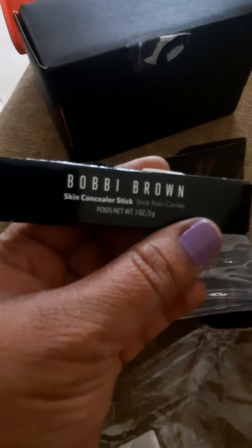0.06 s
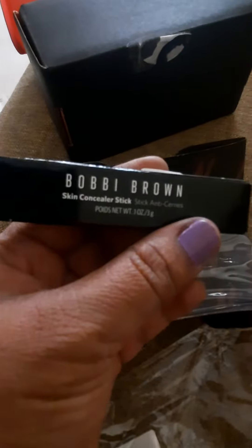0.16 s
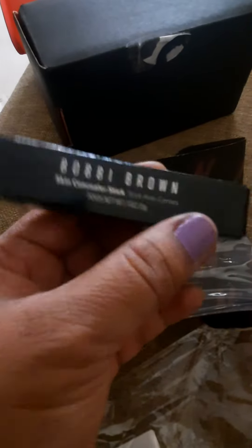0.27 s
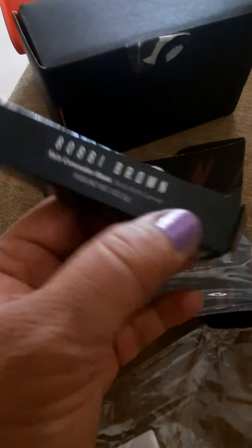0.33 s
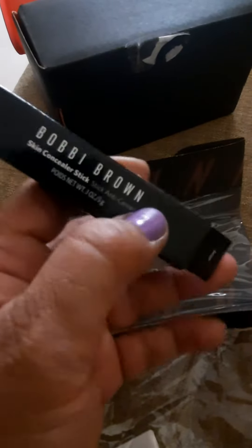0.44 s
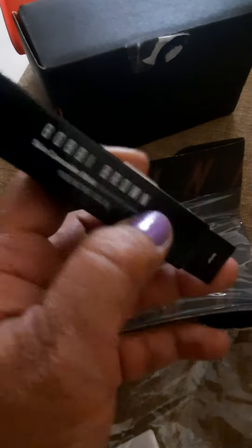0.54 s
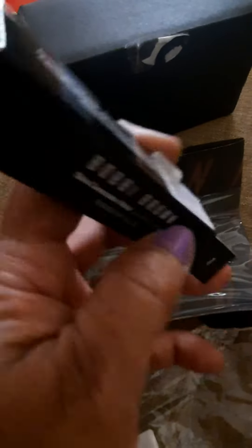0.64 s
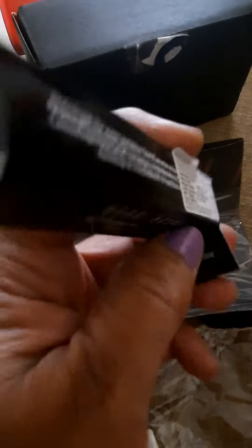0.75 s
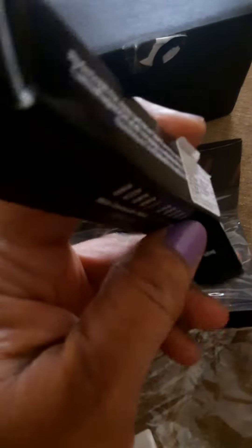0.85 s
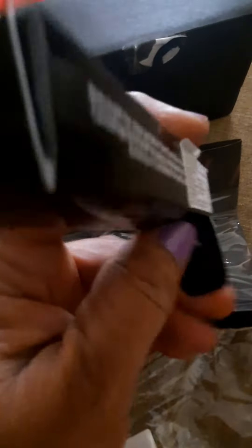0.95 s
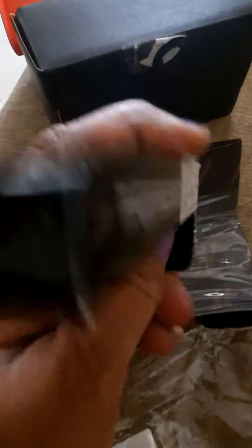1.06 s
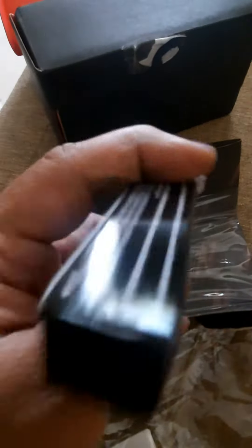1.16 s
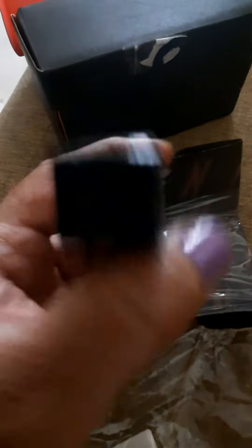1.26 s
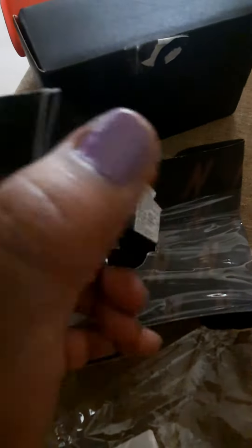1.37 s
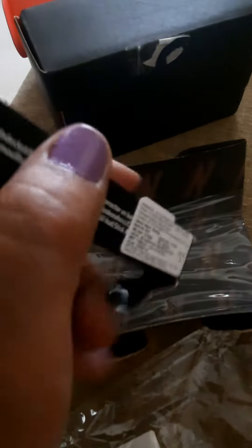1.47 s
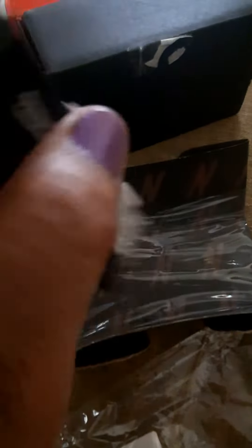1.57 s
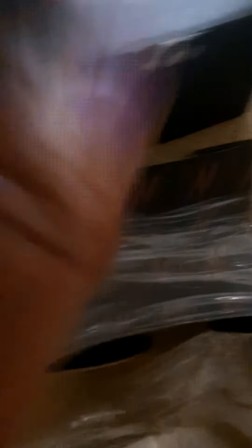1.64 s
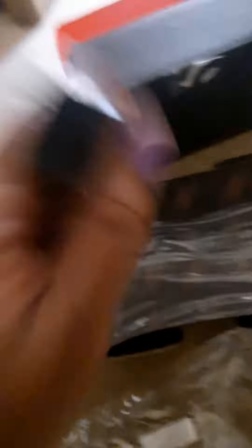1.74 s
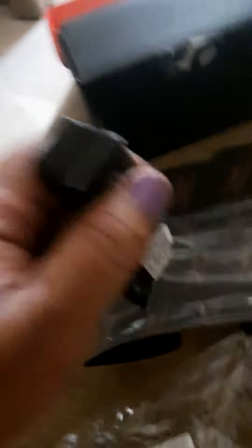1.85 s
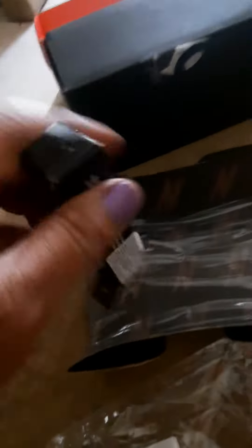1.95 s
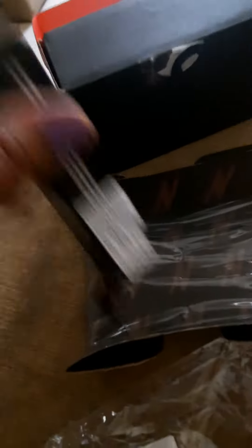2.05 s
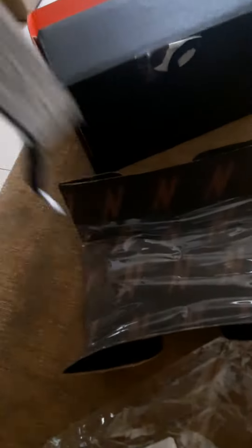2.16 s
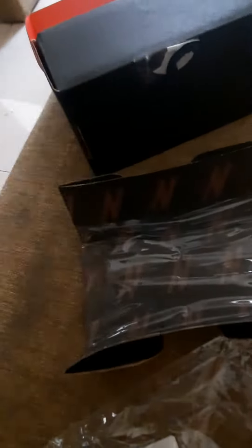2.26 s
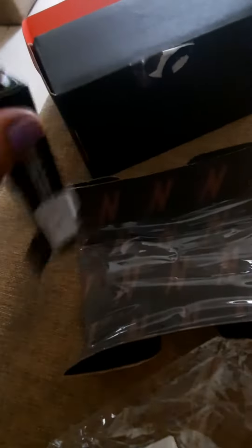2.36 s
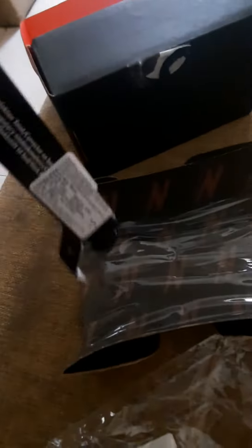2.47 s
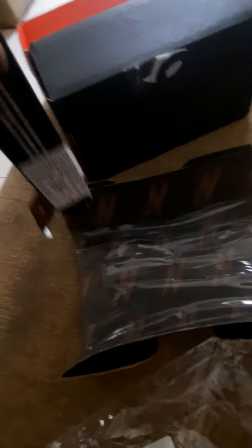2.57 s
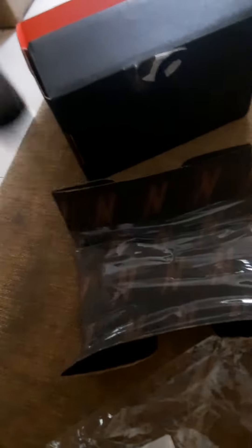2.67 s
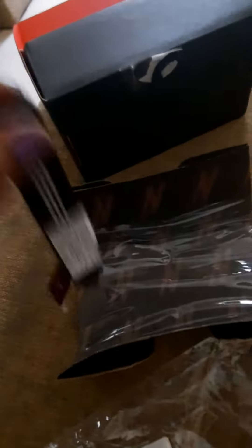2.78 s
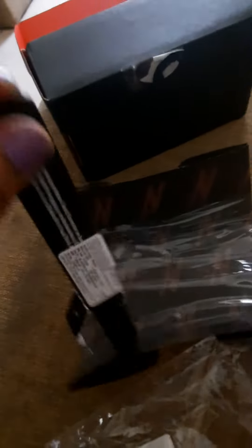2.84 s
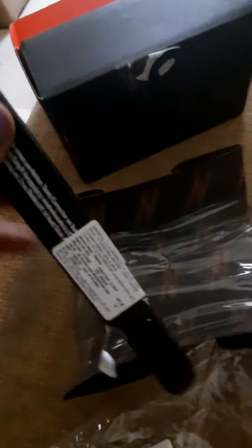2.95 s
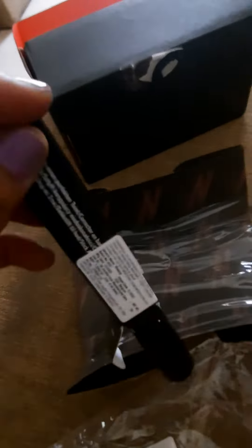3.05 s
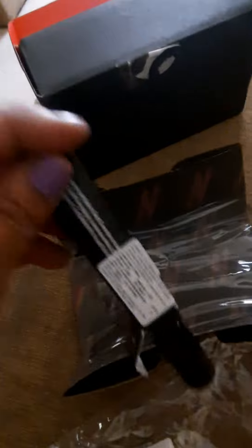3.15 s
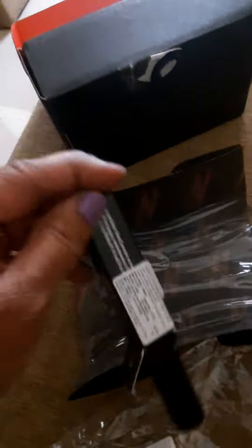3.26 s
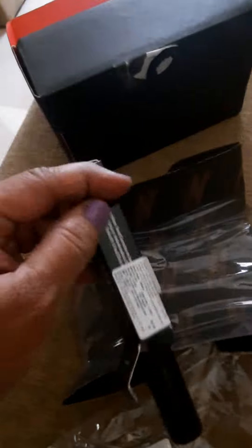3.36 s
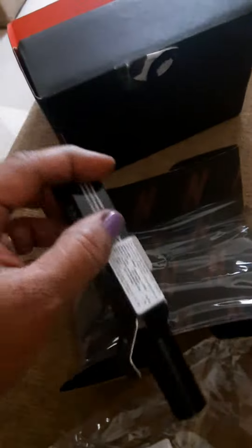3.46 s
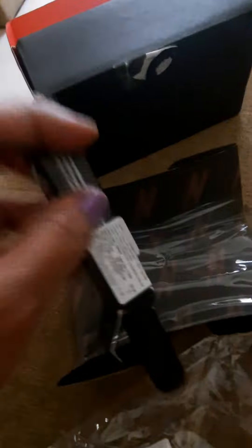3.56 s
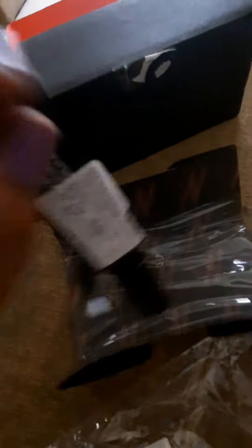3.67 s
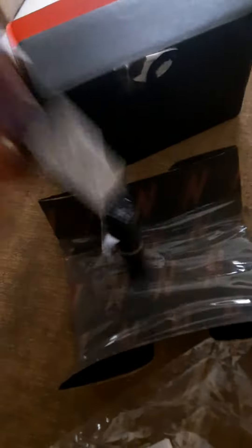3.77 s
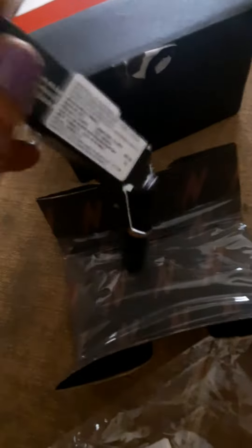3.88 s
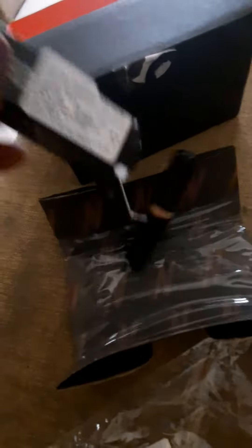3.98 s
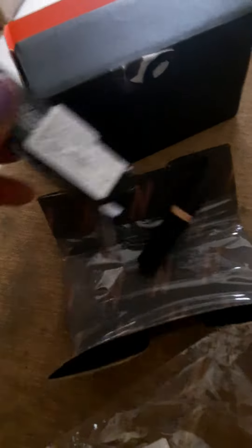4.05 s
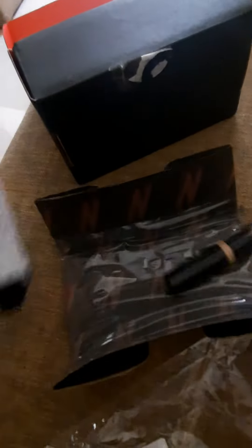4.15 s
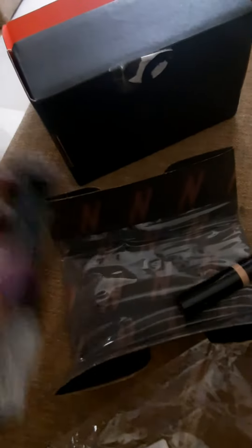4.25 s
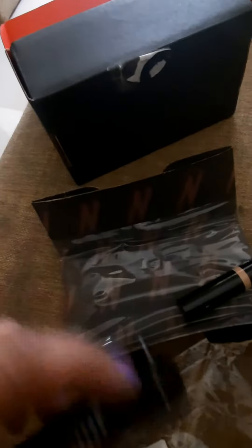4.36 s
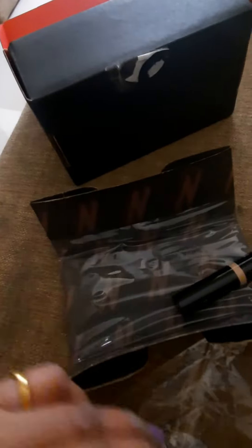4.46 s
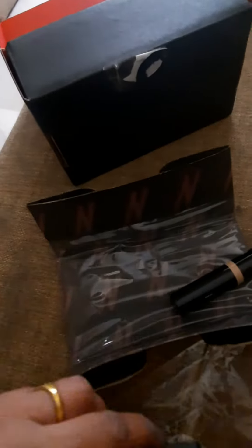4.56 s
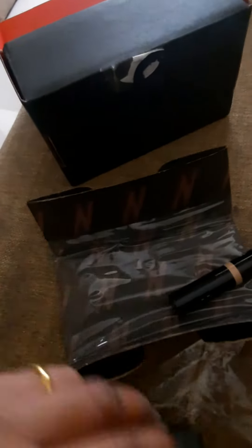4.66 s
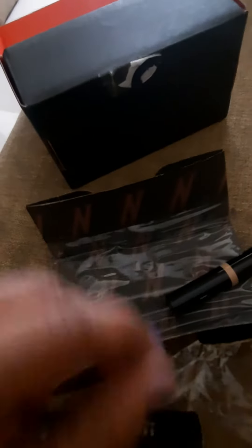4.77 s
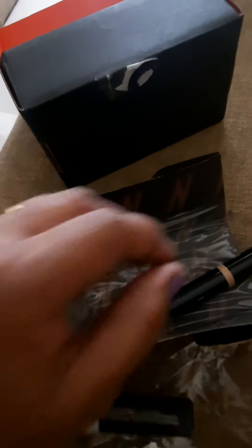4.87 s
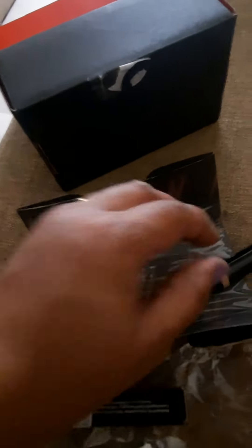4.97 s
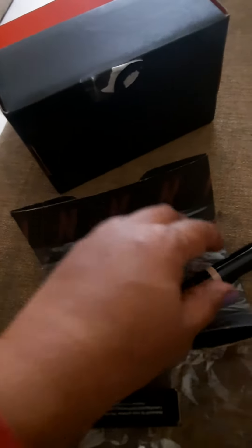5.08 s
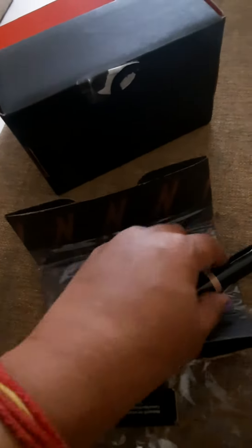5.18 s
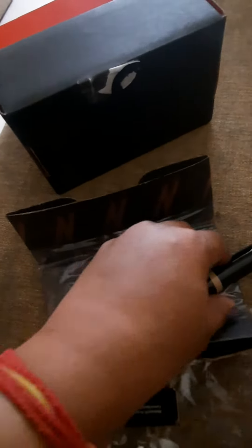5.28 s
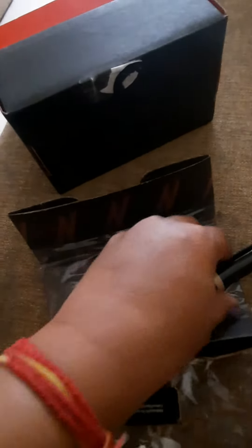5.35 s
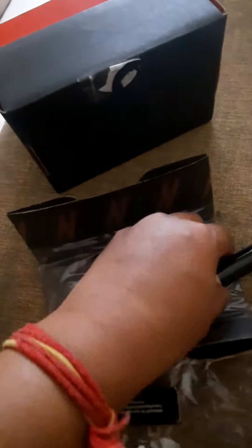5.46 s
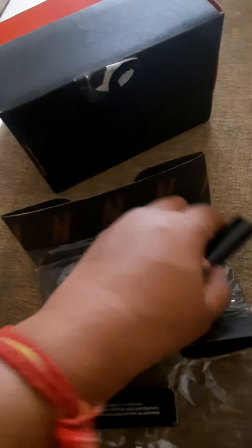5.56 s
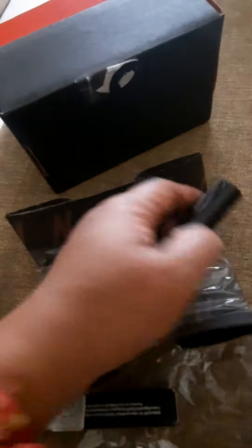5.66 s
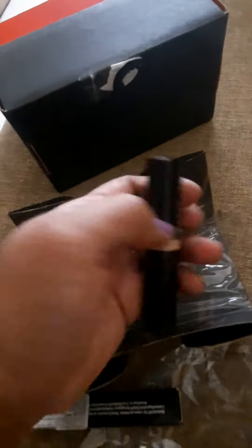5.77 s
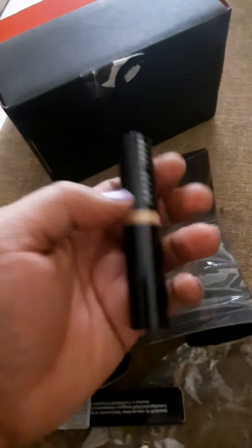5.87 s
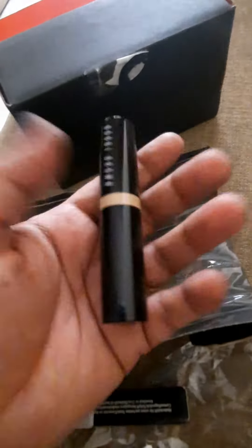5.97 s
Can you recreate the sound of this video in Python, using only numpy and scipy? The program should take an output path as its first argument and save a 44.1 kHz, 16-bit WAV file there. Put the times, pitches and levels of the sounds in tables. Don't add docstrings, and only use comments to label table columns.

```python
import sys
import numpy as np
from scipy import signal
from scipy.fft import rfft, irfft, next_fast_len
from scipy.io import wavfile

SR = 44100
rng = np.random.default_rng(int(sys.argv[2]) if len(sys.argv) > 2 else 0)


def decibels_to_gain(level_db):
    exponent = np.asarray(level_db, float) / 20
    return 10 ** exponent


def pcm_store(signal):
    levels = np.round(np.clip(np.atleast_2d(signal), -1, 1) * 32767)
    wavfile.write(sys.argv[1], SR, levels.astype(np.int16).T)


N = 265482

# time in seconds, left-right balance in dB, low rub resonance in dB, bright rub in dB.
HAND_PATH = [(0, 3, -14, -12), (.74, 4, -11, -3), (1.0, -1, -13, 3), (1.64, 4, -6, -3),
             (1.695, 23, -7.5, -8), (1.75, 2, -10, 1.5), (2.25, 3, -5, -3), (2.31, 12, -6, -8),
             (2.37, 4, -6, -4), (2.74, 9, -2, .1), (2.86, 2, -3, 2), (3.45, -2, .1, 7), (3.72, 2, -1.5, -4),
             (4.15, .1, -4, 2), (4.5, -4, .1, -6), (4.85, -10, 1.5, 1.5), (5.3, -3, 2.5, 5),
             (6.0, -8, 1.5, -3)]


def rms_one(x):
    return x / np.sqrt(np.mean(x ** 2) + 1e-20)


def in_time(rows):
    s, *columns = np.transpose(rows)
    return [np.interp(np.arange(N) / SR, s, column) for column in columns]


def band(x, low_hz, high_hz):
    edges_hz = [low_hz, min(high_hz, .45 * SR)]
    return signal.sosfilt(signal.butter(2, edges_hz, "band", fs=SR, output="sos"), x)


def resonance(x, hz, width_hz):
    r = np.exp(-np.pi * width_hz / SR)
    top = (1 - r * r) / 2
    return signal.lfilter([top, 0, -top], [1, -2 * r * np.cos(2 * np.pi * hz / SR), r * r], x)


def drift(rate_hz):
    r = np.exp(-2 * np.pi * rate_hz / SR)
    wander = signal.lfilter([1], [1, -2 * r, r * r], rng.standard_normal(N + SR))
    return rms_one(wander[SR:])


def sides(pan_db):
    return np.sqrt(2 / (1 + decibels_to_gain(2 * np.array([-pan_db, pan_db]))))


def pair(length, alike):
    shared, left, right = rng.standard_normal((3, length))
    alike = np.clip(alike, 0, 1)
    return np.sqrt(alike) * shared + np.sqrt(1 - alike) * np.array([left, right])


def add(out, sound, s, level_db, pan_db, window_s):
    start = sound[:, :int(window_s * SR)]
    sound = sound / np.sqrt(np.mean(start ** 2, axis=1, keepdims=True))
    lag_s = .0007 * np.tanh(pan_db / 9.0)
    for side, gain, late_s in zip(range(2), sides(pan_db), (max(-lag_s, 0), max(lag_s, 0))):
        at = int((s + late_s) * SR)
        out[side, at:at + sound.shape[1]] += decibels_to_gain(level_db) * gain * sound[side, :N - at]


def strokes(rows, rest_db):
    t, out = np.arange(N) / SR, np.full(N, float(rest_db))
    for s, db, rise_s, fall_s, *hold_s in rows:
        before = (s - t) / rise_s
        after = (t - s - sum(hold_s)) / fall_s
        out = np.maximum(out, db - 20 * np.maximum(np.maximum(before, after), 0))
    return out


def snaps():
    # start in seconds, level in dB, panel resonance in Hz, bright part in dB. Brittle
    film_cracks = [(0.433, -61, 2860, -21), (0.8552, -49, 2300, -9), (1.1606, -63.5, 4960, 15.5),
                   (1.38, -60, 3830, 2.5), (1.5067, -39, 5290, 5), (1.6923, -16.5, 1860, -11),
                   (1.8184, -43, 5050, -8.5), (1.9524, -55, 5060, -2.5), (2.3073, -27, 2800, -1),
                   (2.7449, -26, 2280, 7.5), (2.867, -33, 3500, 1), (3.708, -45.5, 2830, 9),
                   (3.7914, -30.5, 5360, -3), (4.1358, -33, 2640, 1), (4.163, -47, 4910, 6),
                   (4.2092, -45, 3940, 6), (4.2555, -46, 5050, 7), (4.6229, -57, 4650, 2),
                   (4.703, -47, 3050, 4), (4.7824, -46, 5150, -4), (4.9458, -58, 2960, 12.5),
                   (4.9548, -52, 2710, 4), (4.9733, -61.5, 4000, 15), (5.125, -52.5, 2400, 8),
                   (4.22, -45, 2700, 1), (5.4501, -56, 4000, 13.5), (5.5558, -68.5, 5490, 15.5),
                   (5.6429, -57.5, 5480, 22),
                   (.807, -60, 4500, 0), (1.1165, -55, 3400, 0), (1.336, -58, 6200, 3),
                  (1.878, -58, 5500, -3), (1.895, -60, 4000, -6), (3.8605, -42, 2500, -6),
                  (3.9765, -54, 6000, 4), (4.001, -46, 2500, -4), (4.028, -54, 3500, -4),
                  (4.1245, -48, 4500, 2), (4.1495, -46, 4000, -2), (4.2015, -52, 5500, 3),
                  (4.2335, -54, 4500, 2), (4.247, -55, 4800, 2), (4.313, -61, 3100, -4),
                  (4.405, -63, 3250, -5), (4.4815, -63, 5000, 2), (4.5165, -63, 5000, 6),
                  (4.544, -67, 4000, 0), (4.607, -63, 4000, 3), (4.687, -55, 6000, 7),
                  (1.467, -56, 6000, 3), (1.52, -58, 6000, 6), (1.678, -48, 5000, 2), (1.757, -54, 4000, 2),
                  (1.989, -54, 2500, -5), (4.727, -58, 5000, 6), (4.756, -62, 5000, 3),
                  (4.79, -60, 3500, 2), (4.862, -66, 5000, 6), (4.894, -63, 5000, 5), (4.902, -62, 5500, 2),
                  (4.986, -63, 5500, 6), (5.136, -61, 5000, 6), (5.149, -60, 5500, 5),
                  (5.157, -60, 5000, 6), (5.458, -57, 6000, 6), (5.495, -63, 5500, 5),
                  (5.542, -64, 5500, 6), (5.566, -65, 5500, 5), (5.635, -58, 3000, 8),
                  (5.694, -64, 5000, 3), (5.722, -63, 5000, 6), (5.841, -66, 5500, 3)]
    card_folds = [(0.7384, -47, 2770, -6), (1.3422, -52.5, 3370, -5), (1.4563, -48, 4490, 7.5),
                  (1.6422, -38, 3630, -9.5), (1.6557, -42, 5170, -5), (1.6958, -31, 4360, 2),
                  (1.7103, -31, 1490, 2), (1.7216, -37, 2580, -11), (1.7447, -34.5, 3170, -5.5),
                  (1.7689, -40, 2410, -9), (1.926, -50, 5050, -19), (1.9736, -35, 4880, -13),
                  (2.3142, -32, 2100, 2), (2.3705, -25.5, 2400, 2.5), (2.5314, -56, 2890, -8),
                  (2.56, -50, 4040, -12.5), (2.8515, -20, 1700, -14), (2.7548, -30, 2760, -6.5),
                  (2.8498, -16, 1150, -6), (2.8604, -22, 1580, -5), (3.0556, -30.5, 1490, -41),
                  (3.6805, -37, 2980, -5.5), (3.7372, -33.5, 3450, -7), (3.7587, -35.5, 2600, -14.5),
                  (3.8168, -23, 1380, -22.5), (4.6607, -46, 5350, 5), (4.6697, -50.5, 3010, 12),
                  (4.8684, -61, 3040, 8), (4.9157, -48, 5490, 2), (5.657, -49, 1740, 9)]
    card_tears = [(0.8392, -53, 3740, -0.5), (1.6125, -46, 4100, -6.5), (2.0225, -36, 2670, -5.5),
                  (2.0256, -32, 3320, -5.5), (2.0317, -33, 1150, -1), (2.2892, -39, 3190, -9.5),
                  (2.725, -41, 2080, -9.5), (2.7847, -27.5, 2300, -6.5), (3.0616, -36.5, 1360, -11),
                  (3.1476, -52, 1080, -23), (3.625, -42.5, 1000, -3.5), (3.7672, -36.5, 2410, -20.5),
                  (3.774, -31.5, 2940, -5), (3.7953, -30, 2780, -15.5), (3.8092, -24, 1370, -12),
                  (3.8338, -33, 1320, -9.5), (3.986, -43, 1300, -4), (4.6465, -51, 2760, 2.5),
                  (4.7179, -49.5, 1155, 4), (4.9085, -57.5, 5480, 15.5)]
    slow_crunches = [(2.017, -43, 4500, -3), (2.731, -36, 2400, 0.5), (2.792, -41, 3000, 2),
                     (3.979, -50, 5000, 7), (4.091, -46, 2500, 5), (4.126, -40, 4600, 9),
                     (4.155, -45, 5500, 6)]
    # its events, time to fade by 60 dB in seconds, swell time in seconds.
    kinds = [(film_cracks, .0065, 0), (card_folds, .013, 0),
             (card_tears, .029, 0), (slow_crunches, .02, .008)]
    out, t = np.zeros((2, N)), np.arange(3000) / SR
    hands_db = in_time(HAND_PATH)[0]
    for rows, t60_s, swell_s in kinds:
        for s, level_db, hz, bright_db in rows:
            pan_db = hands_db[int(s * SR)]
            rise_s = swell_s + t60_s * np.clip((-20 - level_db) / 150, .02, .14)
            since = np.maximum(t - swell_s, 0)
            fade = decibels_to_gain(-60 * since / t60_s) + decibels_to_gain(-35 - 60 * since / 0.059)
            shape = np.minimum(t / rise_s, 1) ** 2 * fade
            ragged = decibels_to_gain(5.5 * rng.standard_normal(len(t)))
            cracks = pair(len(t), alike=.4) * ragged * shape
            panel = resonance(resonance(cracks, hz, 0.36 * hz), hz, 0.26 * hz)
            panel += decibels_to_gain(-6) * band(cracks, 0.62 * hz, min(2.47 * hz, 6500))
            panel += decibels_to_gain(-13) * band(cracks, 500, 1900)
            bright = band(cracks, 4100, 12500)
            add(out, panel, s, level_db, pan_db, window_s=0.0058 + swell_s)
            add(out, bright, s, level_db + bright_db, pan_db, window_s=0.0045 + swell_s)
    return out


def knocks():
    # pitch in Hz, level in dB, time to fade by 60 dB in seconds.
    body_tones = [(118, -13, 0.037), (300, -40.5, 0.053), (330, -11, .075), (455, -11, 0.05),
                  (750, -8.5, 0.029), (1130, -27, 0.021), (1424, -14, 0.04)]
    # start in seconds, level in dB, main tone in Hz, left-right balance in dB.
    dry_taps = [(1.6976, -29, 269, 15), (1.7182, -34, 280, 18), (1.9727, -47.5, 850, -13),
                (2.306, -35, 328, 18), (2.7458, -33, 697, 4), (2.7861, -33.5, 777, 2.5),
                (2.8505, -21, 325, -25), (2.858, -22, 310, -7), (2.888, -28.5, 323, -17),
                (3.737, -40, 304, -4.5), (3.8088, -15.5, 746, 2.5), (3.8095, -18, 400, 2),
                (3.8182, -20.5, 750, -2), (3.836, -29, 448, 4), (3.8595, -29, 450, 3),
                (3.9862, -29, 300, -3), (3.9866, -34, 640, 1), (4.1366, -21, 607, 4), (4.14, -29, 300, -3),
                (5.347, -44, 296, -10)]
    ringing_thumps = [(1.4577, -55, 800, -7), (2.0331, -36, 930, 1), (2.0403, -44, 317, -23),
                      (2.3683, -45, 306, 2.5), (3.0575, -28, 354, -5.5), (3.15, -33.5, 333, -7.5),
                      (3.256, -45, 369, -5), (3.2912, -43.5, 273, -4), (3.628, -33.5, 350.7, -11),
                      (3.811, -31, 118, -2), (3.857, -37, 118, -2), (3.872, -35, 400, 3),
                      (4.159, -42, 600, 1), (3.961, -46, 420, 0.5), (4.031, -44, 720, 1),
                      (4.088, -42, 940, 3), (4.183, -44, 660, 1), (4.245, -50, 680, 1),
                      (3.9978, -35, 293, -3.5), (4.0613, -37, 700, 2), (4.6497, -49.5, 278, -7),
                      (5.375, -42, 300, -8), (5.4075, -37, 373, -7), (5.416, -35, 300, -7),
                      (5.4336, -40, 263, 1)]
    tap_contact_s, thump_contact_s = .00043, .0016
    kinds = [(dry_taps, .038, tap_contact_s), (ringing_thumps, .062, thump_contact_s)]
    out, t = np.zeros((2, N)), np.arange(9000) / SR
    hz, tone_db, t60s = np.transpose(body_tones)[:, :, None]
    phase = t / .0003 - 2
    contact = decibels_to_gain(5.5) * phase * np.exp(-phase ** 2)
    for rows, t60_s, soft_s in kinds:
        for s, knock_db, main_hz, pan_db in rows:
            nearness_db = -4.0 * abs(np.log2(hz / main_hz))
            chance_db = 2.3 * rng.standard_normal(hz.shape) + 4.1 * rng.standard_normal((2, len(hz), 1))
            strengths = decibels_to_gain(tone_db + nearness_db + chance_db)
            detune = 1 + 0.0064 * rng.standard_normal(hz.shape)
            ringing = decibels_to_gain(-60 * t / t60s) * np.sin(2 * np.pi * hz * detune * t)
            body = np.sum(strengths * ringing, axis=1)
            twin = .45 * np.cos(2 * np.pi * 1.11 * main_hz * t)
            main = decibels_to_gain(-60 * t / t60_s) * (np.sin(2 * np.pi * main_hz * t) - twin)
            blow = (tap_contact_s / soft_s) ** 2 * contact
            sound = blow + (main + body) * (1 - np.exp(-t / soft_s))
            add(out, sound, s, knock_db, pan_db, window_s=0.0036 + 2 * soft_s)
    return out


def wobbles():
    # start in seconds, level in dB, pitch in Hz, time to fade by 60 dB in seconds.
    panel_wobbles = [(2.04, -47, 1050, .35), (2.865, -40, 1050, .3), (3.06, -48, 900, .2),
                     (3.15, -54, 1100, .1), (3.82, -31, 380, .2), (3.865, -40, 750, .08),
                     (4.0, -45, 750, .2), (4.075, -45, 330, .3), (4.085, -47, 900, .12),
                     (4.15, -52, 600, .3)]
    out, t = np.zeros((2, N)), np.arange(12000) / SR
    for s, level_db, hz, t60_s in panel_wobbles:
        width_hz = .3 * hz
        shaken = resonance(resonance(pair(len(t), alike=.8), hz, width_hz), hz, 2 * width_hz)
        shape = decibels_to_gain(-60 * t / t60_s) * np.minimum(t / .004, 1)
        add(out, shaken * shape, s, level_db, -2.5, window_s=.03)
    return out


def rub():
    # time in seconds, level in dB,
    # last 20 dB of rise in seconds, first 20 dB of fall in seconds, hold in seconds.
    finger_slides = [(.31, -65, .05, .085, .1), (.686, -66.5, .2, .045, .001), (.75, -54, .015, .025, .045),
                     (.885, -64, .01, .1, .03), (.925, -57, .012, .04, .12), (1.12, -62, .06, .3, .04),
                     (1.34, -66, .03, .2, .04), (1.47, -56, .14, .09, .035), (1.66, -56, .1, .03, .02),
                     (1.95, -64, .2, .1, .06), (2.73, -50, .012, .05, .11), (3.003, -53, .1, .035, .001),
                     (3.269, -60, .29, .07, .001), (3.49, -62.5, .06, .04, .065),
                     (3.803, -40.5, .077, .086, .001), (4.08, -55, .08, .35, .12),
                     (4.9, -62, .15, .13, .05), (5.39, -53, .15, .1, .04), (5.64, -61, .25, .135, .001)]
    # time in seconds, level in dB, first 20 dB of fall in seconds.
    sudden_slips = [(.85, -57, .1), (1.706, -30, .015), (2.035, -45, .056), (2.091, -61.5, .12),
                    (2.26, -62, .2), (2.39, -40, .04), (2.867, -38, .055), (3.075, -55, .14),
                    (3.642, -50.5, .037), (3.993, -51, .1), (4.655, -53, .14), (5.13, -56, .24)]
    # pitch in Hz, width in Hz, level in dB.
    card_colour = [(1020, 990, 0), (2400, 1200, 0), (3170, 840, -4.5), (4000, 1800, -4.5)]
    # pitch in Hz, width in Hz, level in dB.
    gloss_colour = [(6260, 2300, 6), (8200, 3300, -7.5), (12500, 2000, -11)]
    pan_db, press_db, gloss_db = in_time(HAND_PATH)
    jerks = [(s, db, .025, fall_s) for s, db, fall_s in sudden_slips]
    rub_db = strokes(finger_slides + jerks, rest_db=-86)
    slip_now = rng.random(N) < 550 * decibels_to_gain(5 * drift(15)) / SR
    slips = slip_now * decibels_to_gain(2.5 * rng.exponential(1, N).clip(0, 4))
    noise = (1 + 0.6 * signal.lfilter([1], [1, -.95], slips)) * pair(N, alike=0.083)
    tones = []
    for hz, width_hz, db in card_colour:
        tone = resonance(resonance(noise, hz, width_hz), hz, 3 * width_hz)
        tones.append(decibels_to_gain(db + 3.0 * drift(6.6)) * tone)
    body = rms_one(sum(tones[1:])) + decibels_to_gain(press_db) * rms_one(tones[0])
    bright = sum(decibels_to_gain(db + 2.5 * drift(4)) * resonance(noise, hz, width_hz)
                 for hz, width_hz, db in gloss_colour)
    sheen = rms_one(band(bright, 4800, 15500))
    sheen_db = np.maximum(rub_db, -77) + gloss_db
    body = decibels_to_gain(rub_db + 1.6 * drift(30)) * body
    sheen = decibels_to_gain(sheen_db + 1.6 * drift(30)) * sheen
    return sides(pan_db) * decibels_to_gain(1.5 * drift(40)) * (body + sheen)


def handling():
    # time in seconds, level in dB,
    # last 20 dB of rise in seconds, first 20 dB of fall in seconds, hold in seconds if any.
    hand_shudders = [(0.05, -66, .5, 1.3), (1.42, -51, .06, .06, .4), (1.9, -49, .05, .1, .17),
                     (2.32, -59.5, .3, 3.0), (2.885, -48, .13, .1), (3.297, -62.5, .7, .2),
                     (3.831, -48, .076, .064), (4.011, -48, .03, .046), (4.25, -57, .6, 1.0),
                     (5.4, -55, .3, .2), (5.697, -56, .12, .19)]
    # time in seconds, level in dB,
    # last 20 dB of rise in seconds, first 20 dB of fall in seconds.
    table_drags = [(1.473, -61, .2, 3.0), (2.039, -57, .21, .22), (2.319, -60, .19, 1.7),
                   (2.768, -45, .064, .05), (2.873, -32, .022, .079), (3.27, -58, .5, .14),
                   (3.658, -52, .08, .114), (3.831, -34, .045, .072), (4.12, -42, .4, .18),
                   (4.735, -58.5, .7, .15), (5.38, -50, .55, .2), (5.66, -54, .31, .6)]
    # pitch in Hz, width in Hz, level in dB.
    hollow_tones = [(143, 28, -1), (259, 77, -3.5), (312, 57.4, 1.5), (432.5, 100, -8.5), (700, 240, -18)]
    shudder_db = strokes(hand_shudders, rest_db=-80)
    drag_db = strokes(table_drags, rest_db=-70)
    shudder = rms_one(resonance(resonance(pair(N, alike=1.0), 74.5, 14), 66, 30))
    noise = pair(N, alike=0.82)
    drag = np.zeros((2, N))
    for k, (hz, width_hz, db) in enumerate(hollow_tones):
        drag += (-1) ** k * decibels_to_gain(db) * resonance(noise, hz, width_hz)
    shudder = decibels_to_gain(shudder_db) * shudder * sides(-4.0)[:, None]
    return shudder + decibels_to_gain(drag_db + 2.0 * drift(23)) * rms_one(drag) * sides(-10.0)[:, None]


def room(x):
    t60_s, wall_cut_hz, level_db = 0.36, 5900, -22
    size = next_fast_len(N + SR)
    w = 2 * np.pi * np.arange(size // 2 + 1) / size
    dull = 1 / (1 + 1j * w * SR / (2 * np.pi * wall_cut_hz))
    source, out = rfft(x.mean(axis=0), size), np.zeros((2, len(w)), complex)
    for k, lag_s in enumerate(rng.uniform(.008, .035, 16)):
        loop = decibels_to_gain(-60 * lag_s / t60_s) * dull * np.exp(-1j * w * lag_s * SR)
        out[k % 2] += loop / (1 - loop) * (-1) ** (k // 2)
    return decibels_to_gain(level_db) * irfft(out * source, size)[:, :N]


def coloured(spectrum, white):
    edges = 20 * 2 ** np.arange(0, 10, .5)
    centres = np.sqrt(edges[1:] * edges[:-1])
    hz, db = np.transpose(spectrum)
    gains = decibels_to_gain(np.interp(np.log(centres), np.log(hz), db))
    return sum(g * band(white[k % 2], a, b) for k, (g, a, b) in enumerate(zip(gains, edges, edges[1:])))


def room_tone():
    # pitch in Hz, level in dB per Hz.
    floor_colour = [(18, -46), (30, -17.5), (82, 6.5), (229, -4.5), (332, -1.5), (608, -15), (792, -14.5),
                    (3380, -20), (4530, -31.5), (14500, -23.5), (16500, -47)]
    # pitch in Hz, width in Hz, level in dB.
    far_whines = [(3380, 150, -72), (781, 18, -79), (1690, 300, -71), (1050, 250, -74), (3300, 220, -77)]
    # start in seconds, end in seconds.
    whine_times = [(-1, 1.45), (.2, 1.35), (5.55, 7), (4.15, 4.65), (4.3, 4.85)]
    shared, own = rng.standard_normal((2, 1, N)), rng.standard_normal((2, 2, N))
    low = signal.butter(1, 350, fs=SR)
    white = [signal.lfilter(*low, a - b) + b for a, b in zip(shared, own)]
    out, t = decibels_to_gain(-67.5 - 2.8) * rms_one(coloured(floor_colour, white)), np.arange(N) / SR
    for (hz, width_hz, db), (start, end) in zip(far_whines, whine_times):
        on = np.clip(np.minimum(t - start, end - t) / 0.04, 0, 1)
        whine = resonance(resonance(pair(N, alike=.1), hz, width_hz), hz, width_hz)
        out = out + decibels_to_gain(db) * on * rms_one(whine)
    return out


def scene():
    hits = snaps() + knocks() + wobbles()
    return hits + room(hits) + rub() + handling() + room_tone()


def roll_off(x):
    return signal.sosfilt(signal.butter(12, 17150, fs=SR, output="sos"), x)


def record(dry):
    trimmed = signal.sosfilt(signal.butter(4, 45, "high", fs=SR, output="sos"), dry)
    trimmed = signal.sosfilt(signal.butter(12, 15900, fs=SR, output="sos"), trimmed)
    trimmed = trimmed - .6 * resonance(trimmed, 9690, 1900)
    mix = 1.242 * np.tanh(trimmed / 1.166)
    return roll_off(mix)


dry = scene()
out = record(dry)
pcm_store(out)
```